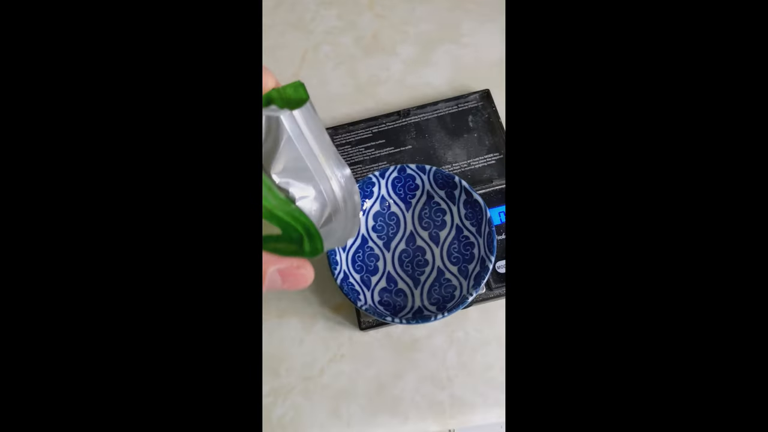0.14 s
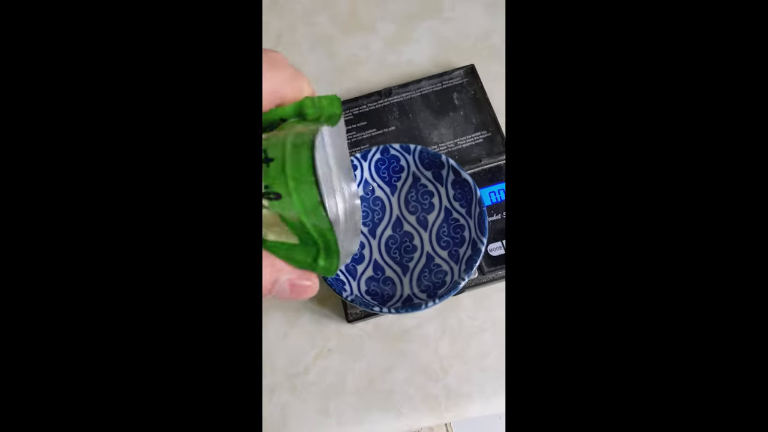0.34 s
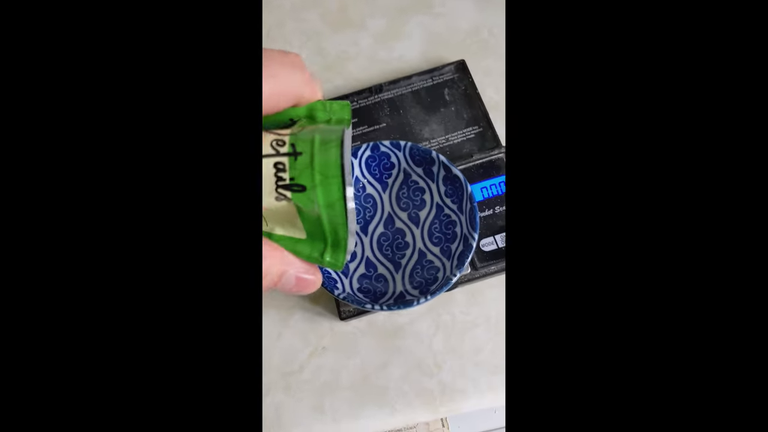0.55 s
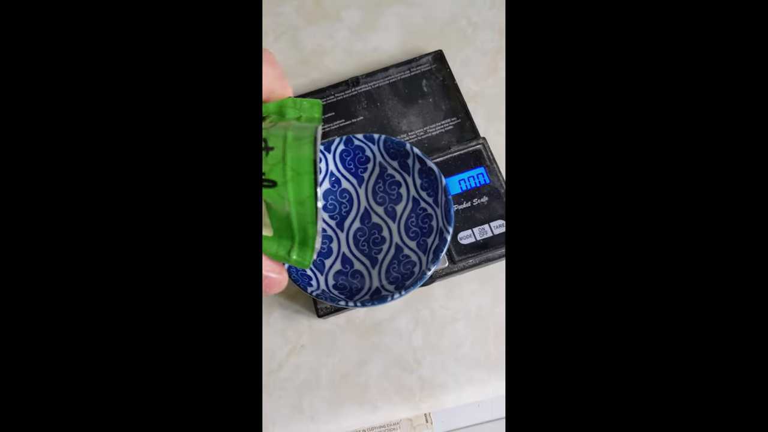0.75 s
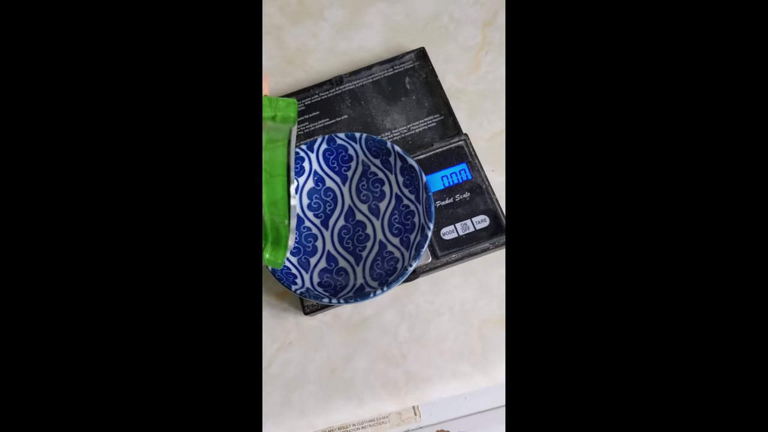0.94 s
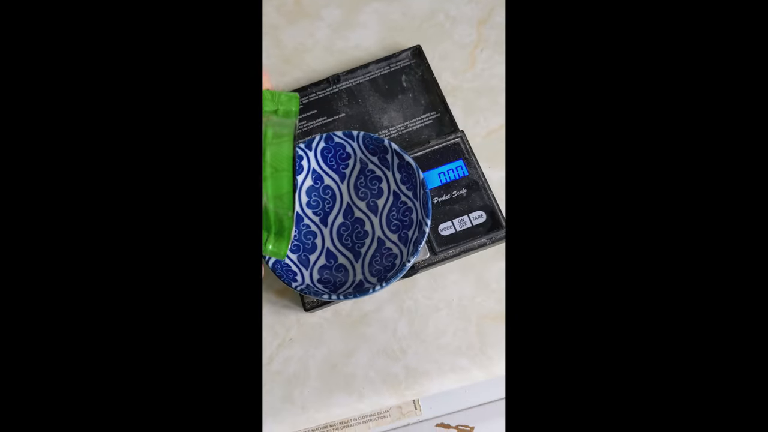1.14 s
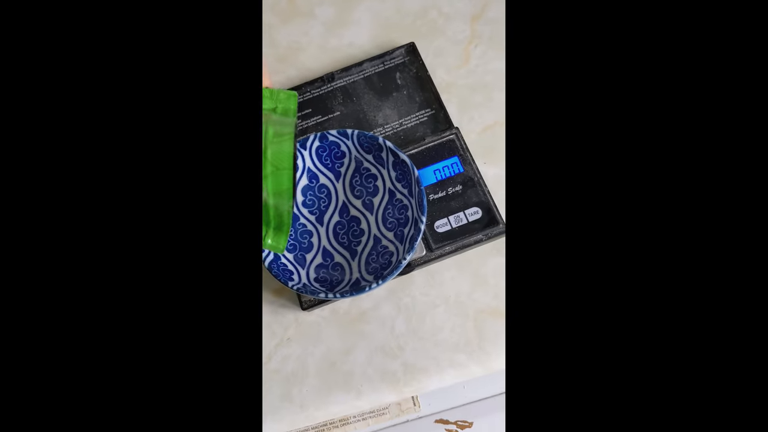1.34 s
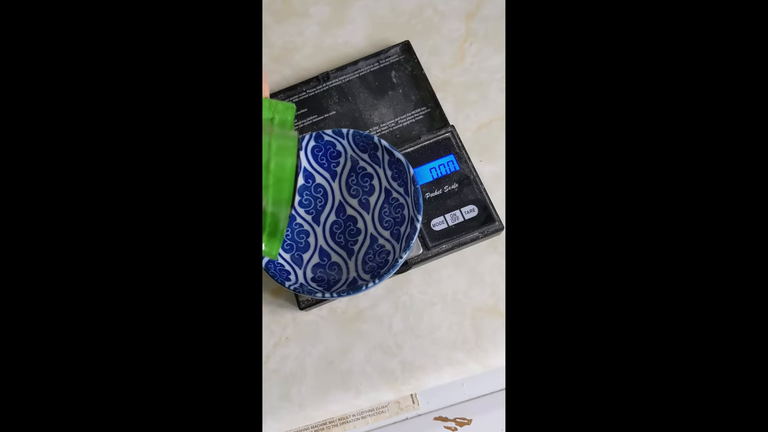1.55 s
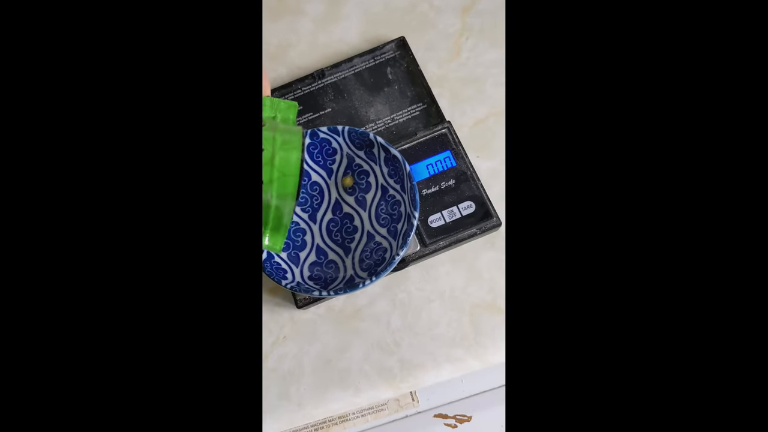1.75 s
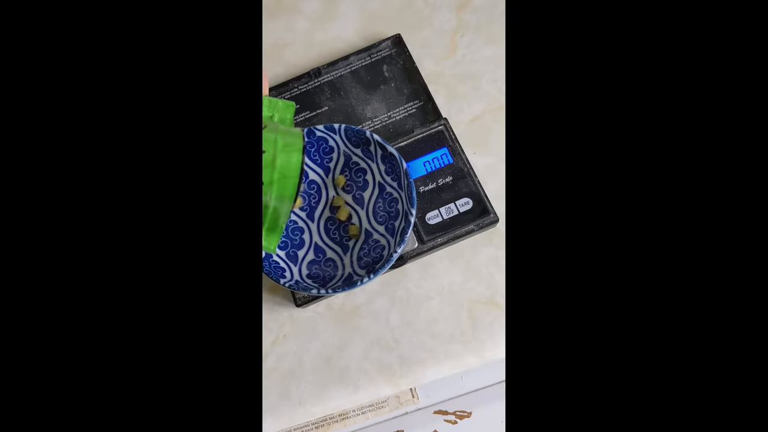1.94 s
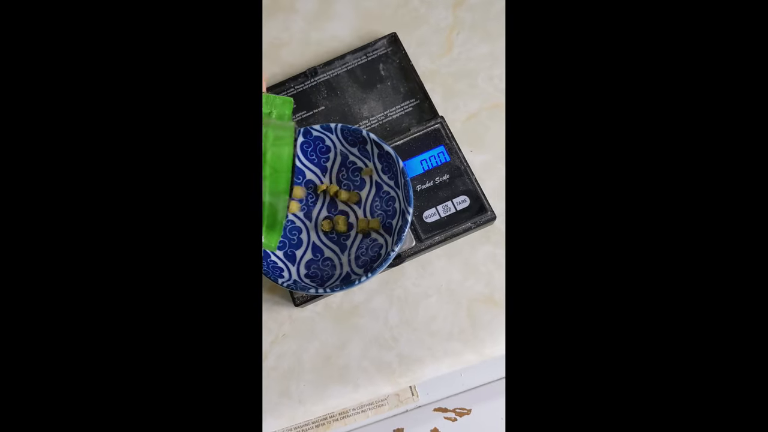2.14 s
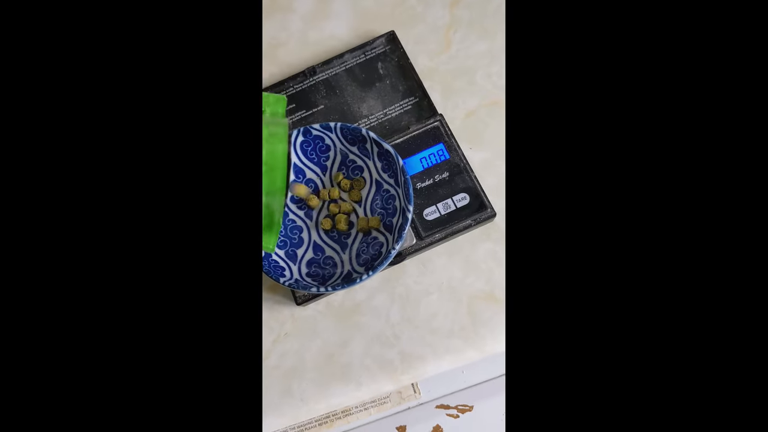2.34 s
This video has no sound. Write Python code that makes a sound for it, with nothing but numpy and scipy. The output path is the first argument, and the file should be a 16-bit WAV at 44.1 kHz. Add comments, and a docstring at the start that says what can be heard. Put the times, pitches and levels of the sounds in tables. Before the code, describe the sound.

Small pellets pour into a ceramic bowl from a stiff foil pouch. First the pouch crinkles with one loud pop, then the pellets clatter in with thin, high pings and settle. Heard close up in a quiet room.

```python
"""Separate snaps and one loud pop: a stiff foil-lined pouch buckles as it is tipped, film sliding on film.
Its lip brushes a small ceramic bowl; then pellets slide out, clatter into the bowl and settle,
some landings drawing a thin, very high ping from the glaze. Snaps and knocks are filtered
noise bursts, pop and pings decaying sines. Heard close up by two microphones in a quiet room."""
import sys
import numpy as np
from scipy import signal
from scipy.fft import rfft, irfft
from scipy.io import wavfile
from scipy.ndimage import uniform_filter1d

SR = 44100
rng = np.random.default_rng(int(sys.argv[2]) if len(sys.argv) > 2 else 0)


def generate_wav(sig):
    """Save sig (samples, or channels by samples) to the path in sys.argv[1] as 16-bit PCM at SR."""
    pcm = np.round(np.clip(np.atleast_2d(sig).T, -1, 1) * 32767).astype(np.int16)
    wavfile.write(sys.argv[1], SR, pcm)


N = 110250
FFT_SIZE = 4096
BIN_HZ = np.fft.rfftfreq(FFT_SIZE, 1 / SR)
LEFT_LAG_S = .00022
PAN_SPLIT = np.array([[.5], [-.5]])


def amp(db):
    """Decibels to gain."""
    return 10 ** (np.asarray(db) / 20)

def unit_rms(x):
    """Scales to an rms of one."""
    return x / np.sqrt(np.mean(x ** 2) + 1e-20)

def decay(t, t60):
    """Envelope falling 60 dB in t60 seconds."""
    return np.exp(-np.log(1000) * t / t60)

def lookup(table, hz=BIN_HZ):
    """Interpolates on a log-frequency axis."""
    table_hz, value = np.transpose(table)
    return np.interp(np.log(hz + 1), np.log(table_hz + 1), value)

def add(mix, start_s, sound):
    """Mixes in a stereo sound."""
    part = mix[:, round(start_s * SR):]
    part[:, :sound.shape[1]] += sound[:, :part.shape[1]]

def convolve(x, response):
    """Filters each channel; at most N samples."""
    return signal.oaconvolve(x, response, axes=1)[:, :N]

def min_phase(colour_db):
    """Sharp-fronted impulse response of a colour."""
    cepstrum = irfft(np.log(amp(colour_db)))
    half = cepstrum.shape[-1] // 2
    cepstrum[..., 1:half] *= 2
    cepstrum[..., half + 1:] = 0
    return irfft(np.exp(rfft(cepstrum)))

def stereo_response(colour_db, pan):
    """A colour at both microphones, the left slightly late."""
    left, right = min_phase(colour_db + PAN_SPLIT * lookup(pan))
    left = np.pad(left, (round(LEFT_LAG_S * SR), 0))[:len(right)]
    return np.array([left, right])

def ring(modes):
    """Decaying sines of one strike, in stereo."""
    t = np.arange(SR // 2) / SR - np.array([[LEFT_LAG_S], [0]])
    out = 0
    for hz, db, t60, pan_db in modes:
        swing = np.sin(2 * np.pi * hz * np.maximum(t, 0)) * decay(t, t60)
        velocity = np.diff(swing) / (2 * np.sin(np.pi * hz / SR))
        out += amp(db + PAN_SPLIT * pan_db) * velocity
    return out

# Likeness of the two channels. Each row: frequency in Hz, shared power from 0 to 1.
COHERENCE = [(200, .97), (1000, 0.74), (3000, 0.6), (6000, 0.48), (14000, 0.62)]
def burst(decay_s, first_slip=.8):
    """One sharp slip and a dying flurry of smaller ones, evened to a flat colour."""
    slips = rng.standard_normal((3, FFT_SIZE)) * np.exp(-np.arange(FFT_SIZE) / SR / decay_s)
    slips /= np.linalg.norm(slips, axis=1, keepdims=True)
    slips[0, 0] += first_slip
    spectra, shared = rfft(slips), lookup(COHERENCE)
    spectrum = np.sqrt(shared) * spectra[0] + np.sqrt(1 - shared) * spectra[1:]
    power = uniform_filter1d(abs(spectrum) ** 2, size=45, axis=1)
    return irfft(spectrum * rfft(min_phase(-10 * np.log10(power + 1e-9))))

def clicks(events, colour, pan, bass_hz=550, treble_hz=4400, ring_db=8.5, ring_octaves=.16):
    """One burst per event, through the object's colour and a resonance of its own."""
    out = np.zeros((2, N))
    for start_s, db, bass_db, treble_db, ring_hz, decay_s in events:
        bass = bass_db / (1 + (BIN_HZ / bass_hz) ** 4)
        treble = treble_db / (1 + (treble_hz / (BIN_HZ + 1)) ** 4)
        resonance = ring_db * np.exp(-.5 * (np.log2((BIN_HZ + 1) / ring_hz) / ring_octaves) ** 2)
        body = stereo_response(lookup(colour) + bass + treble + resonance, pan)
        click = convolve(burst(decay_s), body)
        click *= np.sqrt(2 * .01 * SR / np.sum(click ** 2))  # energy of 10 ms at unit rms
        add(out, start_s, amp(db) * click)
    return out

def grains(levels, colour, pan, per_s, decay_s, kinds=16):
    """Random patter of tiny contacts along a level curve."""
    size_db = -np.minimum(rng.exponential(1, N), 2)
    hits = amp(size_db) * (rng.random(N) < per_s / SR)
    kind = rng.integers(0, kinds, N)
    level_db = np.interp(np.arange(N) / SR, *np.transpose(levels), left=-120, right=-120)
    hits = unit_rms(hits) * amp(level_db)
    patter = sum(convolve((hits * (kind == k))[None], burst(decay_s)) for k in range(kinds))
    body = stereo_response(lookup(colour), pan)
    return convolve(patter, body / np.linalg.norm(body[0]))


# Noise floor. Each row: frequency in Hz, relative density in dB.
FLOOR_COLOUR = [(20, -10.5), (60, 1), (120, -4), (250, -7.5), (600, -18), (1500, -20.5), (4000, -16),
                (6000, -18), (7700, -14), (9500, -24.5), (15500, -19)]
def noise_floor(level_db=-70):
    """Quiet room tone, partly shared in the bass, and microphone hiss."""
    hz = np.fft.rfftfreq(N, 1 / SR)
    noise = rfft(rng.standard_normal((3, N)))
    shared = .64 / (1 + hz / 800)
    spectrum = np.sqrt(shared) * noise[0] + np.sqrt(1 - shared) * noise[1:]
    pan_db = PAN_SPLIT * lookup([(4000, -.5), (10000, -3), (14000, -13)], hz)
    spectrum *= amp(lookup(FLOOR_COLOUR, hz) + pan_db)
    return amp(level_db) * unit_rms(irfft(spectrum, N))


# Tail decay. Each row: frequency in Hz, t60 in seconds.
TAIL_T60_S = [(150, 0.04), (600, 0.34), (1500, 0.29), (3000, 0.27), (6000, 0.38), (14000, .19)]
# Tail colour. Each row: frequency in Hz, gain in dB.
TAIL_DB = [(100, -8.5), (300, -3.5), (700, -5), (1300, -11), (2500, -7.5), (4000, -10.5), (8000, -11.5),
           (15000, -12)]
# Near reflections. Each row: left and right delay in seconds, gain in dB.
ECHOES = [(.0021, 0.0026, -20.5), (.0058, 0.0054, -22), (.0093, 0.0088, -20), (.0128, 0.015, -25),
          (.0172, 0.011, -27.5), (0.0294, 0.035, -30)]
def room(dry, frame=256, build_s=.0068):
    """Echoes off the worktop and nearby things, and a small room's diffuse tail."""
    hz, t, noise = signal.stft(rng.standard_normal((2, SR)), SR, nperseg=frame)
    t60 = lookup(TAIL_T60_S, hz)[:, None]
    gain = np.sqrt(2 * np.log(1000) / t60 / SR) * amp(lookup(TAIL_DB, hz))[:, None]
    response = signal.istft(noise * decay(t, t60) * gain, SR, nperseg=frame)[1]
    response *= np.minimum(np.arange(response.shape[1]) / SR / build_s, 1)
    for left_s, right_s, db in ECHOES:
        response[0, round(left_s * SR)] += amp(db)
        response[1, round(right_s * SR)] += amp(db)
    return convolve(dry, response)


# Buckling panels. Each row: start in seconds, level, bass and treble in dB, ring in Hz, decay in seconds.
SNAPS = [(0.0075, -43, 7, -4, 1320, 0.0057), (0.0125, -45, -5, -1, 1290.0, 0.0029),
         (0.0663, -53, 8, 16, 1400, 0.0059), (0.1336, -37.5, -19, -1, 1420, 0.0017),
         (0.1403, -20, 0.5, 8.5, 2710.0, 0.0017), (0.215, -31.5, 11, 7.5, 1100, 0.0038),
         (0.353, -35, -14, -9.5, 1320, 0.0061), (0.3615, -46.5, 29, -18, 1520, 0.0049),
         (0.3721, -36.5, -2, 10, 3120, 0.0015), (0.386, -46, 10, -9, 1376, 0.0048),
         (0.4215, -45, 3, -5, 1060.0, 0.0046), (0.4275, -41.5, 9, -10, 1050, 0.0071),
         (0.4594, -45, 8, -2, 1146, 0.0049), (0.5061, -31, -4, 8, 1550, 0.0018),
         (0.5092, -32, 8.5, -0.5, 520, 0.0034), (0.5556, -41.5, 5.5, -3, 1280, 0.0063),
         (0.6176, -36, 0.5, 2, 1150, 0.0027), (0.6424, -48, 2, 3, 1090, 0.006),
         (0.65, -49, 5, -3, 1140.0, 0.005), (0.6734, -53, 14.5, 12, 600.0, 0.0045),
         (0.7187, -55, 7, -9, 670.0, 0.0044), (0.9325, -36.5, -5, 9, 1300, 0.0028),
         (0.9666, -44.5, -7.5, -3, 1750, 0.0081), (1.0481, -48, -23, 2.5, 1500, 0.0017),
         (1.1123, -62, -12, 20, 3600, 0.0043), (1.139, -63, 3, 12, 1160.0, 0.0043),
         (1.2006, -38.5, 3, -0.5, 552, 0.0087), (1.2275, -44.5, -9, 4, 3100, 0.003),
         (1.2542, -40, 5, 6, 2610.0, 0.0043), (1.2693, -52, -9, 11, 1200, 0.005),
         (1.2787, -43.5, -2, 0, 1200, 0.005), (1.3435, -38.5, -13, 0, 1106, 0.0046),
         (1.3485, -38.5, -13, -9, 3350, 0.002), (1.3544, -38.5, -0.5, 4, 1220, 0.0054),
         (1.3766, -35, -12, 0, 1284, 0.0036), (1.3795, -38.5, -1.5, 1.5, 3450, 0.0025),
         (1.3961, -44.5, 0, -3, 1030, 0.0041), (1.5499, -44.5, -4, 5, 1120, 0.011),
         (1.5749, -45, 2, -7, 690, 0.0041), (1.6266, -41, 1, -1, 720, 0.0034),
         (1.6559, -54, 12, -5, 650, 0.0055)]
# Wall modes. Each row: frequency in Hz, level in dB, t60 in seconds, left minus right in dB.
POP_MODES = [(740, -25, .022, 2), (2710, -20.5, .012, 5), (3980, -22, .008, 8.5), (4620, -23, 0.0078, -9.5),
             (8570, -28, 0.0068, 0.5)]
# Rustle and film slide. Each row: time in seconds, level in dB.
RUSTLE_DB = [(0, -53.5), (.12, -64), (.3, -63), (.42, -59), (.5, -52), (.66, -68.5), (.76, -89), (1.0, -76),
             (1.18, -72.5), (1.27, -60.5), (1.42, -51.5), (1.52, -70), (1.62, -58.5), (1.7, -53.5)]
SLIDE_DB = [(0, -58.5), (.12, -59.5), (.25, -78), (.45, -66), (.62, -75), (.75, -87.5)]
# Buckling and sliding spectra. Each row: frequency in Hz, relative density in dB.
POUCH_COLOUR = [(40, -39.5), (110, -22.5), (200, -7), (350, -5.5), (600, 2.5), (1200, 3.5), (2000, 2.5),
                (2800, -3), (3700, -7), (5000, -16), (6500, -11.5), (8500, -23), (11000, -25.5),
                (15500, -27.5)]
FILM_COLOUR = [(100, -14.5), (1000, -0.5), (3500, -1.5), (7000, -1.5), (10000, -9), (15000, -6.5)]
# Pouch placement. Each row: frequency in Hz, left minus right in dB.
POUCH_PAN = [(60, 1), (99, 0.5), (160, 1.5), (270, -5), (450, 6.5), (740, 2), (1220, 1.5), (2010, 6),
             (3330, -0.5), (5500, -4.5), (9080, -0.5), (15000, -4.5)]
def pouch(pop_s=.1403):
    """The film snaps, rustles and slides on itself; the wall pops open once and rings."""
    snaps = clicks(SNAPS, POUCH_COLOUR, POUCH_PAN)
    add(snaps, pop_s, ring(POP_MODES))
    rustle = grains(RUSTLE_DB, POUCH_COLOUR, POUCH_PAN, per_s=350, decay_s=.0024)
    slide = grains(SLIDE_DB, FILM_COLOUR, POUCH_PAN, per_s=2500, decay_s=.0025, kinds=6)
    return snaps + rustle + slide


# Landings that ping. Each row: start in seconds, gain in dB.
PINGS = [(1.7448, -39.5), (1.8644, -36), (1.9045, -38.5), (1.964, -46), (2.008, -43), (2.044, -42),
         (2.0594, -39.5), (2.2397, -33), (2.2868, -65), (2.3286, -57), (2.354, -54), (2.385, -69),
         (2.44, -47), (2.4815, -61)]
# Ceramic modes. Each row: frequency in Hz, gain in dB, t60 in seconds, left minus right in dB.
PING_MODES = [(2412, -32, .8, 0), (10830, -15, .12, -6.5), (11000, -20, .1, 4), (14486, -1, .07, -11.5)]
RIM_MODES = [(3612, -73, .7, 0)]
# Tick on the glaze. Each row: frequency in Hz, gain in dB.
TICK_COLOUR = [(100, -24), (600, -1), (3000, -16), (7000, -1), (12000, 12), (15000, 4)]
# Landing placement. Each row: frequency in Hz, left minus right in dB.
PELLET_PAN = [(200, -2), (600, 7.5), (1300, -1), (2700, 5), (3800, -1), (5000, -3.5), (8000, -4.5),
              (11000, 0), (15000, -1.5)]
def bowl(brush_s=1.1123, tick_gain_db=4.5):
    """The pouch brushes the rim once; landings on bare glaze tick and ring the ceramic."""
    out = np.zeros((2, N))
    add(out, brush_s, ring(RIM_MODES))
    ping = ring(PING_MODES)
    glaze = stereo_response(lookup(TICK_COLOUR), PELLET_PAN)
    for start_s, db in PINGS:
        tick = convolve(burst(decay_s=.0022), glaze)
        add(out, start_s, amp(db + tick_gain_db) * tick)
        add(out, start_s, amp(db) * ping)
    return out


# Landings. Each row: start in seconds, level, bass and treble in dB, ring in Hz, decay in seconds.
KNOCKS = [(1.6896, -53, -16, 15, 3980.0, 0.0041), (1.7066, -36.5, -0.5, -4.5, 814, 0.004),
          (1.7283, -48.5, 4, -2, 1180.0, 0.005), (1.7448, -42.5, 1, 9, 1990, 0.0024),
          (1.7691, -44.5, 20.5, 18, 536, 0.005), (1.7805, -43, 6, 1, 544, 0.003),
          (1.8301, -41, 1, -1, 3900, 0.0027), (1.837, -40.5, 11, -8, 1133, 0.0062),
          (1.8487, -39.5, 7, 1, 1150, 0.0059), (1.8558, -40, 4, 0, 1120, 0.003),
          (1.8648, -37, 2, 4, 1940.0, 0.002), (1.878, -39.5, 5.5, -7, 1530, 0.0078),
          (1.9033, -28, -3.5, -3, 1210, 0.0061), (1.927, -28, -3, 3, 2070, 0.004),
          (1.9615, -39, 15, 9, 1140.0, 0.0057), (1.9881, -34.5, 0, 2.5, 3850, 0.0044),
          (2.0085, -33, -7, 2, 2600, 0.004), (2.0231, -36.5, 7.5, 4, 1370, 0.0054),
          (2.0319, -42, -2, -9, 1208, 0.005), (2.0434, -34.5, -4, 7, 1240, 0.0061),
          (2.0582, -43, -9, -3, 1120.0, 0.0039), (2.066, -40, -9, 9, 2560, 0.0099),
          (2.0773, -36.5, 5.5, -5, 1150, 0.0046), (2.092, -44, 3, 4, 2760, 0.0046),
          (2.1529, -34, -6, -2.5, 1480, 0.005), (2.1776, -39.5, 5.5, 4, 1180, 0.0053),
          (2.2089, -39.5, -29, -4, 1660.0, 0.0045), (2.2395, -48, 7, 4, 1635, 0.0026),
          (2.252, -40.5, 2, 4, 1670, 0.0058), (2.2625, -39.5, -16, 6, 1170, 0.0046),
          (2.2868, -40.5, -3, -9, 1970, 0.005), (2.3221, -46.5, 3, 6.5, 1250, 0.0045),
          (2.3519, -45, 10, -4, 1060.0, 0.0055), (2.3654, -36, -4.5, 0.5, 1370, 0.0035),
          (2.4095, -54, 14, 8, 550, 0.004), (2.4467, -41, 3.5, -3, 1190, 0.0042),
          (2.4815, -54, 12, 9, 1310.0, 0.0071)]
# Patter of the pour. Each row: time in seconds, level in dB.
FLOW_DB = [(1.6, -72), (1.72, -50.5), (1.8, -52.5), (1.87, -42), (1.97, -39.5), (2.07, -41.5), (2.12, -46),
           (2.17, -49.5), (2.3, -51.5), (2.42, -57), (2.5, -70)]
# Pellet spectrum. Each row: frequency in Hz, relative density in dB.
PELLET_COLOUR = [(40, -31), (110, -21.5), (200, -6), (350, -4), (600, 1.5), (1200, 3), (2000, 3),
                 (2800, -3.5), (3700, -7), (5000, -16.5), (6500, -12), (8500, -25.5), (11000, -21.5),
                 (15500, -22)]
# Bowl modes stirred by every pellet. Each row: frequency in Hz, gain in dB, t60 in seconds.
HUM_MODES = [(2412, -52, .9), (3740, -59, .35), (7100, -53, .2), (10830, -40, .12), (11130, -42, .1),
             (14486, -54, .07)]
def pellets():
    """Pellets tumble out: clear knocks over a dense patter, keeping the bowl faintly singing."""
    knocks = clicks(KNOCKS, PELLET_COLOUR, PELLET_PAN)
    patter = grains(FLOW_DB, PELLET_COLOUR, PELLET_PAN, per_s=600, decay_s=.0015)
    clatter = knocks + patter
    t = np.arange(SR // 2) / SR
    hum = sum(amp(db) * np.sin(2 * np.pi * hz * t) * decay(t, t60) for hz, db, t60 in HUM_MODES)
    return clatter + convolve(clatter, hum[None])


def scene():
    """Pouch, pellets and bowl in the room."""
    direct = pouch() + pellets() + bowl()
    return direct + room(direct) + noise_floor()


# Microphone response. Each row: frequency in Hz, gain in dB.
MIC_COLOUR = [(20, -2.5), (200, 0), (400, -1.5), (520, 2), (800, -1), (1300, 0.5), (2000, -2), (2750, 1.5),
              (3200, -2.5), (3800, 2.5), (4500, -1.5), (5400, 0.5), (6400, -3), (7400, 0), (8600, 1),
              (10000, -1), (13000, -0.5), (15500, 0.5)]
CUTOFF_HZ = 15950
def record(dry):
    """Microphone colour, then a steep low-pass."""
    coloured = convolve(dry, min_phase(lookup(MIC_COLOUR))[None])
    lowpass = signal.firwin(255, CUTOFF_HZ, window=("kaiser", 9), fs=SR)
    return signal.oaconvolve(coloured, lowpass[None], "same")


dry = scene()
out = record(dry)
generate_wav(out)
```